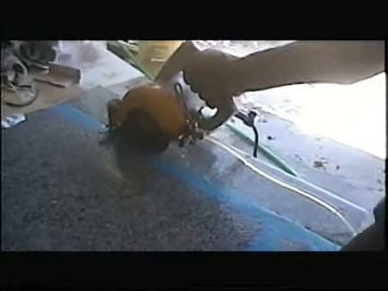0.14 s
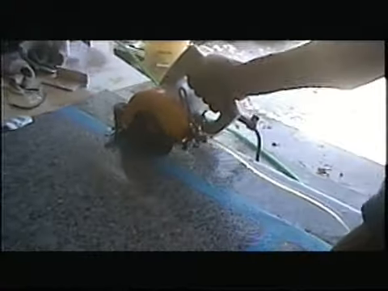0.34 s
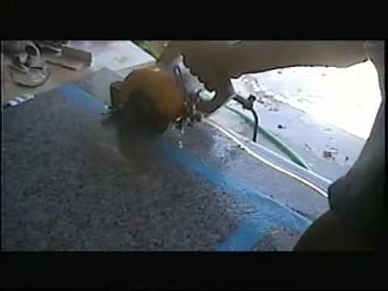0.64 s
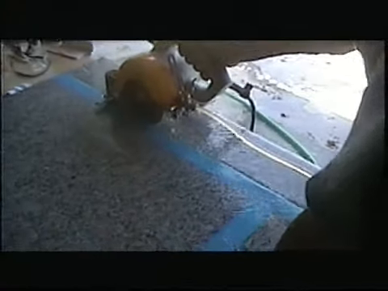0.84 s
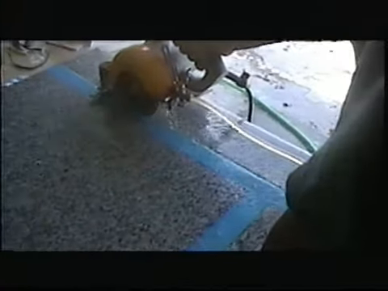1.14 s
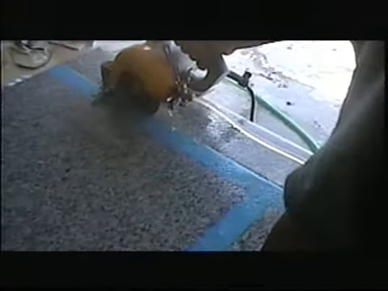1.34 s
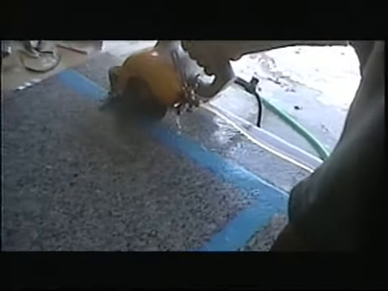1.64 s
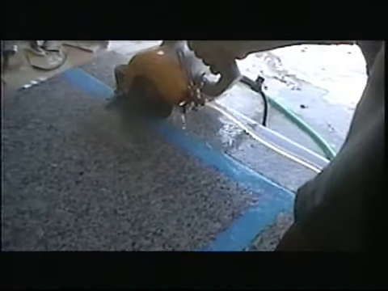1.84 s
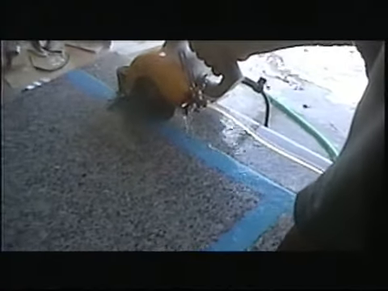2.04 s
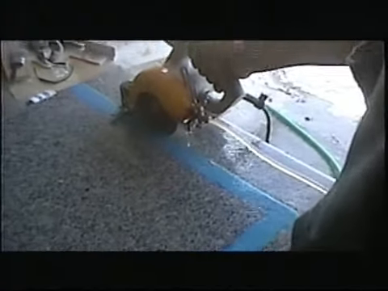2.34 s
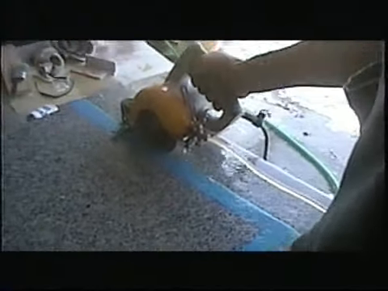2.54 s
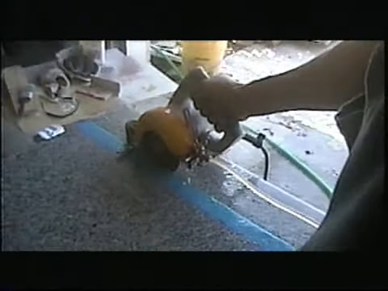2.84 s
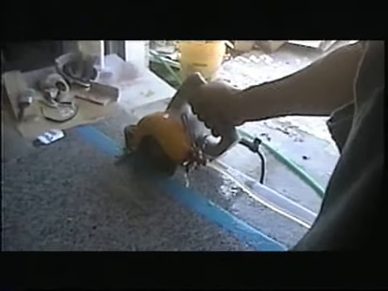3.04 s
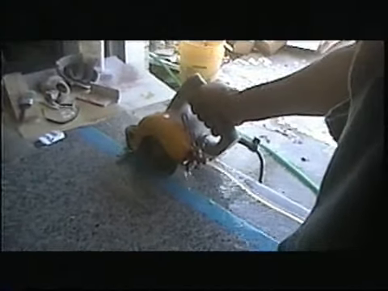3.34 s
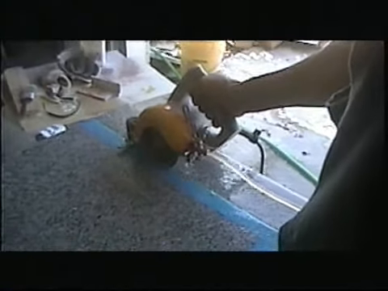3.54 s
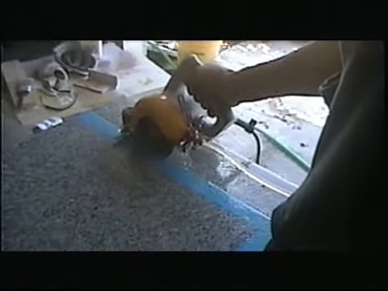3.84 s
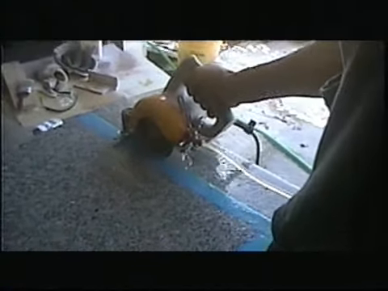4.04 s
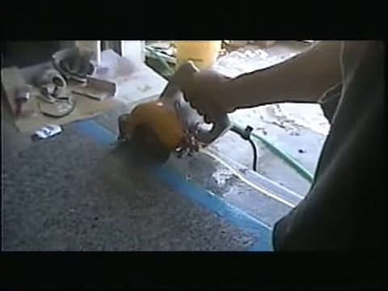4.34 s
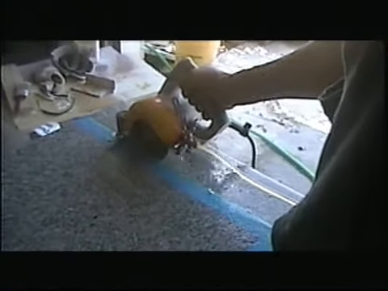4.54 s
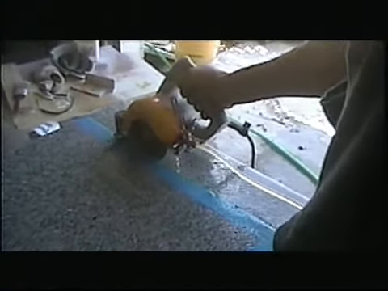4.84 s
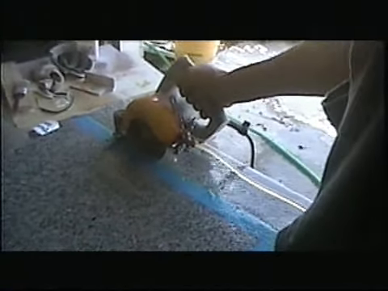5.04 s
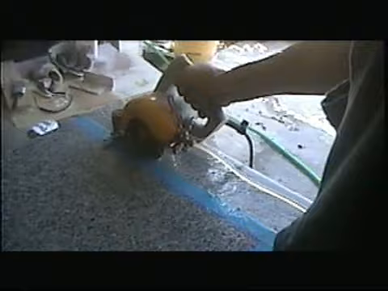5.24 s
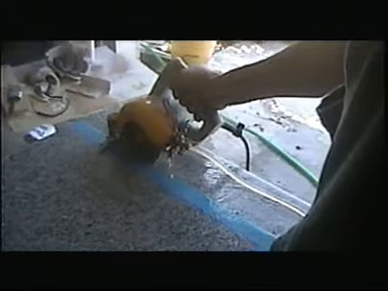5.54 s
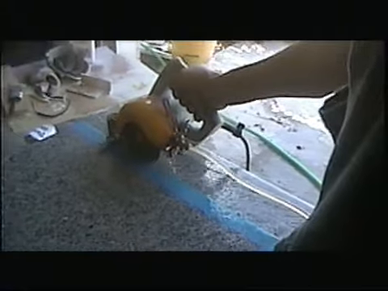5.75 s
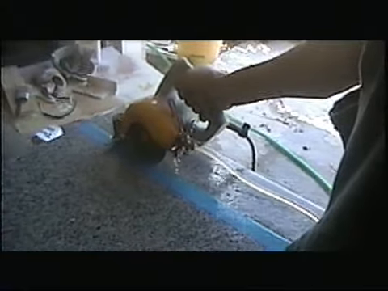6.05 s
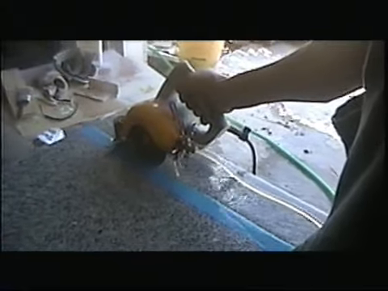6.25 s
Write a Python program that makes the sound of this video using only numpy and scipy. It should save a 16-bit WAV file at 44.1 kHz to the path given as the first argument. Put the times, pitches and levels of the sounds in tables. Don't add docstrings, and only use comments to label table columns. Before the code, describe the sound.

A handheld wet saw is already cutting a stone slab. A dense, gritty scrape and buzzing hum carry wavering metallic whines. The pitch lifts near two seconds, sags as the blade loads around four, then climbs back, with high rings flaring at the end. Close, rough camera sound, on the left side only; the right holds barely audible hiss.

```python
import sys
import numpy as np
from scipy import signal
from scipy.fft import rfft, irfft
from scipy.io import wavfile
from scipy.ndimage import uniform_filter1d, map_coordinates

SR = 44100
rng = np.random.default_rng(int(sys.argv[2]) if len(sys.argv) > 2 else 0)


def natural_amplitude(level_db):
    exponent = np.asarray(level_db, float) / 20
    return 10 ** exponent


def store_pcm(level_fs):
    pcm = np.round(np.clip(level_fs, -1, 1) * 32767).astype(np.int16)
    wavfile.write(sys.argv[1], SR, np.atleast_2d(pcm).T)


N = 282681

# f/Hz, level/dB
TAPE_HISS = [(20, -2), (60, -16), (150, -24), (1200, -20), (7800, -23), (10500, -30), (22000, -34)]
HISS_DB, PILOT_HZ, PILOT_DB = -94.5, 8000.4, -101
# t/s, depth/dB, width/s
DROPOUTS = [(0.089, 1.5, 0.061), (0.311, 4.5, 0.013), (0.359, 2.5, 0.025), (0.659, 10, 0.0054),
            (0.783, 1.5, 0.012), (1.005, 3, 0.014), (1.06, 3.5, 0.056), (1.872, 3, 0.022),
            (1.92, 4.8, 0.02), (1.966, 5, 0.0084), (2.245, 2.5, 0.015), (2.616, 2.5, 0.03),
            (2.697, 3, 0.012), (2.839, 5, 0.015), (2.893, 3, 0.012), (3.08, 6, 0.031), (3.167, 3.5, 0.028),
            (3.211, 3.5, 0.035), (3.501, 0.5, 0.019), (3.573, 2, 0.025), (3.62, 2.5, 0.02),
            (3.702, 1.9, 0.021), (4.048, 0, 0.025), (4.144, 1.5, 0.025), (4.451, 3.5, 0.042),
            (4.489, 3, 0.0063), (4.821, 2, 0.041), (5.301, 0, 0.025), (5.506, 2, 0.023),
            (5.854, 2.5, 0.016)]
# f/Hz, level/dB
FAINT_LIMIT = [(3000, -10), (4300, -8), (5400, -6), (7000, -7), (8500, -9), (9200, -2.5), (10500, -6),
               (12500, -3), (13700, .5), (14300, -.5), (15000, .5), (15700, 2)]
TRACK_DB = 7

# t/s, speed/(turns per s)
BLADE_SPEED = [(0, 132.1), (.32, 131.3), (.8, 135.0), (1.3, 133.1), (1.66, 135.2), (2.02, 140.3),
               (2.27, 140.1), (2.72, 133.6), (3.4, 126.3), (3.84, 123.2), (4.08, 123.7), (4.34, 122.8),
               (4.64, 125.3), (5.1, 127.6), (5.28, 126.7), (5.5, 128.2), (6.2, 130.8), (6.41, 130.1)]

GEAR_MULTIPLES = (2.108, 2.79)
# t/s, length/s, level/dB
GEAR_SWELLS = [
    [(.8, 0.46, -75), (1.8, .5, -81), (2.4, 0.8, -78)],
    [(.6, 0.59, -75), (1.2, 1, -75), (2.9, 0.72, -76)],
]
GEAR_DB = -87

HUM_MULTIPLES = (2, 3, 7, 8, 10, 11, 13, 14, 15, 19)
# t/s, length/s, level/dB
HUM_CATCHES = [
    [(1.3, 0.26, -80)],
    [(.5, .3, -63.5), (1.3, .5, -68)],
    [(.8, 0.79, -59.5), (2.5, 0.56, -62), (3.1, 0.2, -54), (6.1, 0.35, -55)],
    [(4.3, 0.17, -56.5), (5.4, 0.84, -56)],
    [(0.603, 0.32, -59)],
    [(1.6, 0.86, -64), (2.9, 0.49, -62.5), (5.7, 0.65, -59.5)],
    [(.7, 1.1, -63), (1.6, 0.54, -63), (5.7, 2.1, -69)],
    [(2.7, 0.52, -62), (4.64, .2, -55.5), (5.4, 0.84, -56.5), (5.9, 1, -60)],
    [(1.2, 0.48, -60), (3.6, 0.85, -70), (4.1, 0.42, -64), (5.9, 1, -53.5)],
    [(.65, 0.81, -60.5), (5.5, 2, -62)],
]
# f/Hz, width/Hz, level/dB
HOUSING_MODES = [(254.6, 21.3, -66.5), (373.7, 29.3, -60), (419, 8.2, -62.5), (923, 59, -58.5),
                 (984.5, 50, -62.5), (1037.6, 92, -63.5), (1329, 44, -67.5), (1400, 82, -66.5),
                 (1871, 68, -62), (1939, 38, -59.5)]
HOUSING_DB = -79.5

WHINE_MULTIPLES = (21, 22, 23, 27, 29, 30, 34, 35, 36)
# t/s, length/s, level/dB
WHINE_CATCHES = [
    [(.3, 0.87, -56.5), (4, .4, -63)],
    [(1.55, 0.89, -56.5), (2.25, 0.49, -56), (2.85, 0.3, -57.5), (4.75, 0.37, -52)],
    [(1.5, .3, -60), (3.02, 0.25, -53), (4.25, 0.5, -54), (5.55, 0.74, -52.5)],
    [(1.65, .3, -57), (2.15, 0.49, -55.5), (3.0, 0.56, -54.5), (5.37, 0.63, -58), (4.04, 0.54, -56.5)],
    [(.8, .4, -59), (1.6, 0.44, -54), (3.7, 1, -58)],
    [(1.5, .7, -58), (3.5, .5, -56), (4.85, 0.94, -53), (5.95, 0.65, -56.5)],
    [(.1, 0.4, -54), (1.6, 0.85, -52.5), (3.65, 0.82, -61), (6.25, .4, -54)],
    [(5, 0.35, -56), (5.75, 0.39, -53.5)],
    [(3.55, 0.54, -49.5), (4.5, 0.26, -59), (5.2, 0.42, -65)],
]
WHINE_DB = -68

# t/s, pressure as level/dB, seating of the rim in the groove/dB
CUT_PUSH = [(0, -53, 3.5), (.3, -53, 2.5), (.6, -46, 2.5), (.85, -50, 4.5), (1.3, -49.5, -1.5),
            (1.6, -46.5, -1), (1.8, -51, 2.5), (2.05, -47, -1), (2.6, -52.5, 0), (3.4, -48, -0.5),
            (3.65, -49, 0), (4, -51.5, 0.5), (4.25, -46.5, 1), (4.6, -52.5, 1), (5, -50, 0.5),
            (5.6, -48.5, -0.5), (6, -51, 7), (6.41, -50, 6.5)]
COLOUR_HZ = [700, 2300, 3400, 4150, 4540, 5100, 7000, 8500, 9300, 14000]
# f/Hz, level/dB
SCRAPE_COLOUR = [(30, -24.5), (200, -31.5), (330, -15.5), (450, -11), (600, -1), (1250, -8.5), (2400, 0),
                 (3600, 2), (5350, -3.5), (7000, -9.5), (9150, -4.5), (10500, -2.5), (12800, -1.5),
                 (13900, -12.5), (14600, -5.5), (15700, -23)]
# f/Hz, width/Hz, level/dB
BLADE_MODES = [(1050, 304, 0), (1450, 280, -2.5), (1894, 300, -1), (2980, 93, 4), (3447, 420, 3.5),
               (3915, 510, 6.5), (4561, 214, 9), (5924, 193, 1), (6540, 314, 0.5), (7590, 730, 2),
               (8465, 300, 7.5), (9810, 490, 0), (10780, 650, -3), (13000, 300, -20), (13300, 250, -18),
               (14400, 400, -27)]
TURN_REPEAT = [(1, .2, 20), (6, .1, 20), (9, .55, 9), (18, .55, 7), (22, .8, 11), (36, .8, 10),
               (45, .68, 5), (62, .62, 3.5), (85, .62, 4), (120, .55, 3)]
# t/s, level/dB
WATER_SPRAY = [
    (0, 1),
    (1.2, 1.5),
    (2.2, 0),
    (2.7, -0.5),
    (3.3, -0.5),
    (4.3, 1.5),
    (5.4, 1),
    (5.9, 3),
    (6.41, 2),
]
# t/s, length/s, level/dB
RING_FLARES = [
    [(.2, 0.18, 12), (1.4, 0.23, 3.5), (2.4, 0.22, -4), (3.3, 0.77, -5), (3.8, .2, 2), (4.8, .2, 3),
     (5.4, 0.27, 8), (6, .2, 8.5), (6.41, 0.27, 5)],
    [(1.5, .6, 4.5), (2.35, 0.43, 2.5), (3.5, 0.98, -2), (4.3, 0.49, 2.5), (5.8, 0.74, 3), (6.41, 0.35, -3)],
]
# t/s, length/s, level/dB
FLARES_6KHZ = [
    (2, .5, 0.5),
    (4.454, .3, 1.5),
    (5.2, 0.43, 3),
    (6.25, 0.57, 2.5),
]
LOW_STEADY, RING_STEADY, SHRILL_STEADY = .8, 1, .9
LOW_DB_PER_TURN = 0.1724
LOW_SEATING = 0.21
RINGING = 0.16


def evened(x):
    return x / np.sqrt(np.mean(abs(x) ** 2) + 1e-30)


def read(points, hz):
    f, value = np.transpose(points)
    return np.interp(np.log(hz + 1), np.log(f + 1), value)


def columns(rows, t):
    s, *values = np.transpose(rows)
    return np.array([np.interp(t, s, v) for v in values])


def drift(hz, count):
    noise = rng.standard_normal((count, N // 44 + 600))
    coarse = signal.lfilter(*signal.butter(2, hz / 500), noise)[:, 500:]
    return np.array([np.interp(np.arange(N) / 44, np.arange(len(c)), evened(c)) for c in coarse])


def bump(t, s, length):
    return np.exp(-(2 * (t - s) / length) ** 2)


def modes(rows, hz):
    return sum(natural_amplitude(2 * db) / (1 + (2 * (hz - f) / width) ** 2) ** 2 for f, width, db in rows)


def tape_hiss():
    colour = natural_amplitude(read(TAPE_HISS, np.fft.rfftfreq(N, 1 / SR)))
    hiss = irfft(rfft(rng.standard_normal((2, N))) * colour, N)
    return natural_amplitude(HISS_DB) * evened(hiss)


def blade_turns():
    speed = uniform_filter1d(columns(BLADE_SPEED, np.arange(N) / SR)[0], 4000)
    return np.cumsum(speed * (1 + 0.00084 * drift(19.9, count=1)[0])) / SR


def tones(turns, multiples, usual, catches, waver_db, waver_hz, slip):
    t = np.arange(0, N / SR + .02, .01)
    level_waver = drift(waver_hz, count=len(multiples))
    phase_waver = drift(waver_hz, count=len(multiples))
    sound = np.zeros(N)
    for k, rows, w, p in zip(multiples, catches, level_waver, phase_waver):
        caught = sum(natural_amplitude(2 * db) * bump(t, s, length) ** 2 for s, length, db in rows)
        size = np.interp(np.arange(N) / SR, t, np.sqrt(2 * (usual(t, k) + caught)))
        looseness = min(k / 7, 1)
        phase = 2 * np.pi * (k * turns + rng.random()) + slip * p * looseness
        sound += size * natural_amplitude(waver_db * w * looseness) * np.sin(phase)
    return sound


def gearbox(turns):
    return tones(turns, GEAR_MULTIPLES, lambda t, k: natural_amplitude(2 * GEAR_DB), GEAR_SWELLS,
                 waver_db=0.5, waver_hz=3.5, slip=0.21)


def hum_power(t, k):
    seating_db = columns(CUT_PUSH, t)[1] * (k > 3)
    housing = natural_amplitude(2 * HOUSING_DB) + modes(HOUSING_MODES, k * columns(BLADE_SPEED, t)[0])
    return housing * natural_amplitude(2 * seating_db)


def hum(turns):
    return natural_amplitude(-.5) * tones(turns, HUM_MULTIPLES, hum_power, HUM_CATCHES,
                            waver_db=2.5, waver_hz=15, slip=0.39)


def whine_power(t, k):
    return natural_amplitude(2 * WHINE_DB) * (1 + modes(BLADE_MODES, k * columns(BLADE_SPEED, t)[0]))


def whine(turns):
    return natural_amplitude(-1.06) * tones(turns, WHINE_MULTIPLES, whine_power, WHINE_CATCHES,
                              waver_db=2.55, waver_hz=16.7, slip=0.81)


def rim(turns):
    rows, k = int(turns[-1]) + 60, np.arange(1, 121)
    multiple, share, memory = np.transpose(TURN_REPEAT)
    share = np.clip(np.interp(k, multiple, share), 0, .99)
    keep = np.exp(-1 / np.interp(k, multiple, memory))
    z = rng.standard_normal((rows, 120)) + 1j * rng.standard_normal((rows, 120))
    worn = [signal.lfilter([np.sqrt(1 - r * r)], [1, -r], c) for r, c in zip(keep, z.T)]
    worn = np.array(worn).T[50:]
    worn = worn / np.sqrt(abs(worn) + .05) * 1.25
    sung = np.isin(k, tuple(HUM_MULTIPLES) + tuple(WHINE_MULTIPLES))
    worn = worn * np.where(sung, .25, 1)
    spectrum = np.pad(worn * np.sqrt(share), ((0, 0), (1, 0)))
    pattern = irfft(spectrum, 2048) * 2048 / np.sqrt(4 * 165)
    pattern = np.hstack([pattern, pattern[:, :1]])
    return map_coordinates(pattern, [turns, turns % 1 * 2048], order=1), (k, share)


def colour_changes(t, speed):
    level_db, seating_db = columns(CUT_PUSH, t)
    ease = level_db.mean() - level_db
    low = LOW_STEADY * ease + LOW_DB_PER_TURN * (speed - speed.mean())
    ring, shrill = (steady * ease + sum(db * bump(t, s, length) for s, length, db in rows)
                    for steady, rows in zip((RING_STEADY, SHRILL_STEADY), RING_FLARES))
    six = sum(db * bump(t, s, length) for s, length, db in FLARES_6KHZ)
    top = ease + columns(WATER_SPRAY, t)[0]
    change_db = np.array([low, 0.93 * low + LOW_SEATING * seating_db, 0 * t, 0 * t, ring,
                          0.53 * ease + six, top + six, shrill, top, top])
    return level_db, change_db


def grind(turns):
    repeated, (k, share) = rim(turns)
    bite = natural_amplitude(1.7 * np.cos(2 * np.pi * turns) + 1.2 * drift(67, count=1)[0])
    hz, t, again = signal.stft(repeated, SR, nperseg=1024, noverlap=768)
    fresh = signal.stft(evened(bite * rng.standard_normal(N)), SR, nperseg=1024, noverlap=768)[2]
    speed = columns(BLADE_SPEED, t)[0]
    order = hz[:, None] / speed
    swell_db = 1.93 * drift(2.37, count=len(BLADE_MODES))[:, np.minimum(t * SR, N - 1).astype(int)]
    plain = natural_amplitude(2 * read(SCRAPE_COLOUR, hz))[:, None]
    swelling = [(f, width, db + s) for (f, width, db), s in zip(BLADE_MODES, swell_db)]
    body = plain + modes(swelling, hz[:, None])
    fresh_share = 1 - np.interp(order, k, share)
    drive = (1 - plain / body) ** RINGING * again + np.sqrt(fresh_share) * fresh
    level_db, change_db = colour_changes(t, speed)
    tilt_db = np.array([np.interp(np.log(hz + 1), np.log(COLOUR_HZ), c) for c in change_db.T]).T
    sound = drive * np.sqrt(body) * natural_amplitude(tilt_db + level_db)
    return natural_amplitude(7.5) * signal.istft(sound, SR, nperseg=1024, noverlap=768)[1][:N]


def scene():
    turns = blade_turns()
    saw = gearbox(turns) + hum(turns) + whine(turns) + grind(turns)
    saw = saw * natural_amplitude(0.58 * drift(20, count=1)[0])
    return np.array([natural_amplitude(TRACK_DB) * saw, np.zeros(N)])


def lose_faint_patches(x):
    hz, t, z = signal.stft(x, SR, nperseg=2048, noverlap=1024, window="cosine")
    patch = uniform_filter1d(uniform_filter1d(abs(z) ** 2, size=8, axis=0), size=2, axis=1)
    patchy_db = 1.3 * np.repeat(rng.standard_normal((len(t), 33)), 32, axis=1).T[:len(hz)]
    moment_db = .8 * drift(1.5, count=1)[0, np.minimum(t * SR, N - 1).astype(int)]
    limit = natural_amplitude(2 * (read(FAINT_LIMIT, hz)[:, None] + patchy_db + moment_db))
    usual = uniform_filter1d(patch, size=24, axis=1)
    limit = limit * usual * (hz[:, None] > 2500)
    kept = np.where(patch > limit, 1, .005)
    return signal.istft(z * kept, SR, nperseg=2048, noverlap=1024, window="cosine")[1][:N]


def top_cut(x):
    return signal.sosfilt(signal.butter(12, 15740, fs=SR, output="sos"), x)


def record(dry):
    t = np.arange(N) / SR
    power_db = 10 * np.log10(uniform_filter1d(dry[0] ** 2, 2600) + 1e-12)
    gain_cut_db = 0.45 * (power_db - power_db.mean())
    dropout_db = sum(db * np.exp(-(1.9 * (t - s) / width) ** 2) for s, db, width in DROPOUTS)
    hiss = tape_hiss()
    tape = .075 * np.tanh(dry[0] * natural_amplitude(-gain_cut_db - dropout_db) / .075)
    live = lose_faint_patches(tape) + hiss[0]
    pilot = natural_amplitude(PILOT_DB) * np.sin(2 * np.pi * PILOT_HZ * t)
    empty = dry[1] + hiss[1] + pilot
    return top_cut(np.array([live, empty]))


dry = scene()
out = record(dry)
store_pcm(out)
```